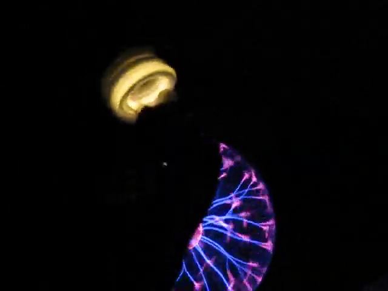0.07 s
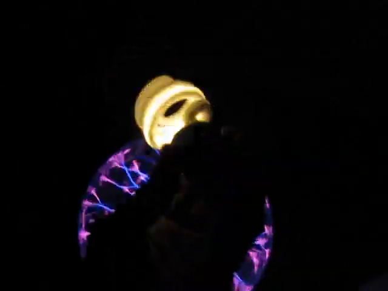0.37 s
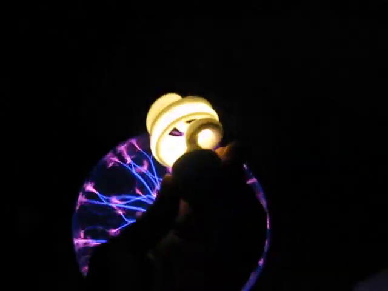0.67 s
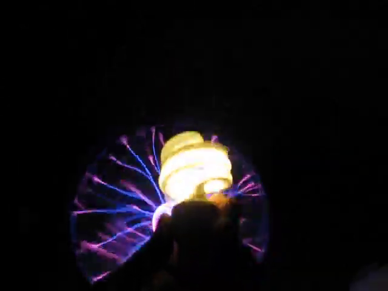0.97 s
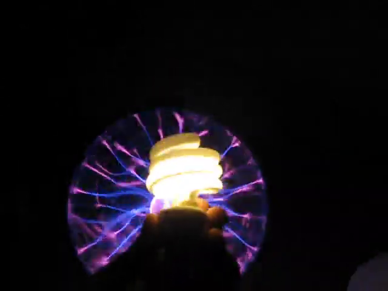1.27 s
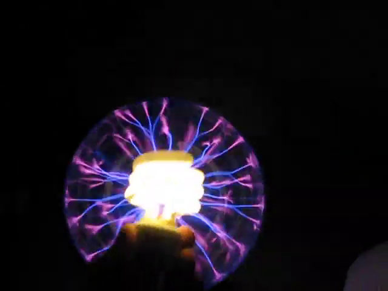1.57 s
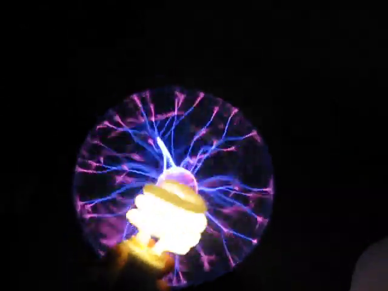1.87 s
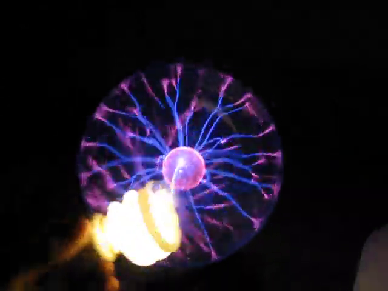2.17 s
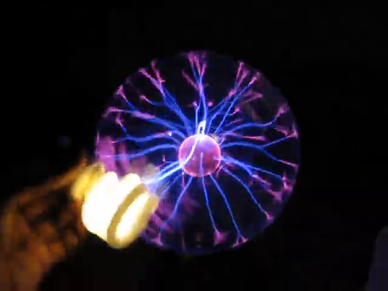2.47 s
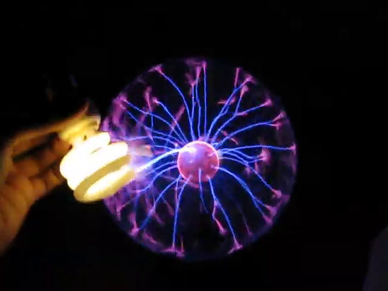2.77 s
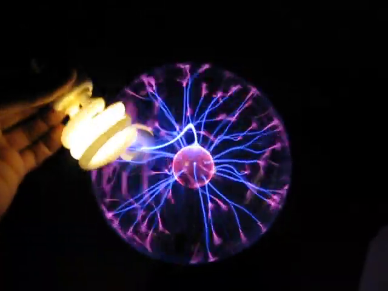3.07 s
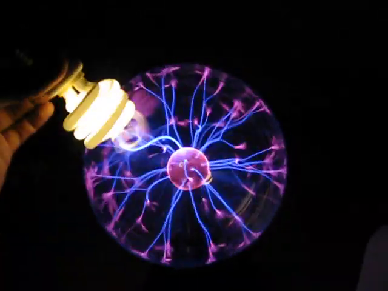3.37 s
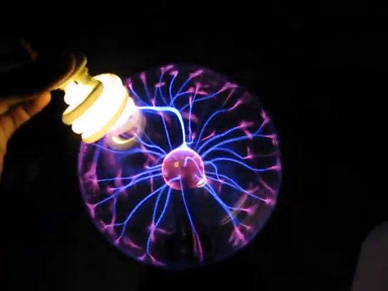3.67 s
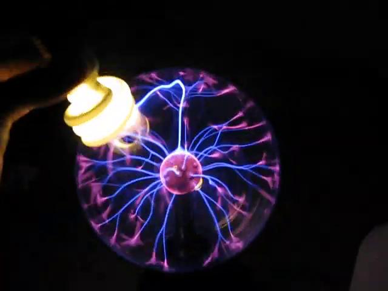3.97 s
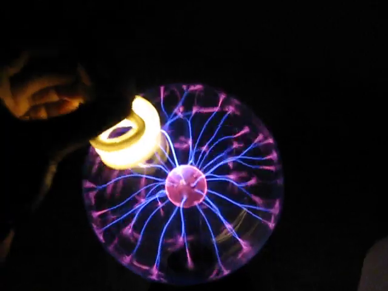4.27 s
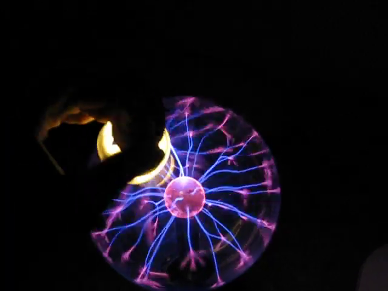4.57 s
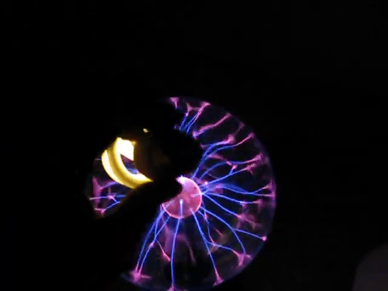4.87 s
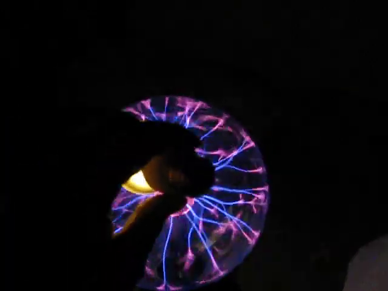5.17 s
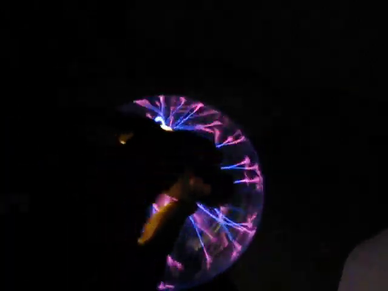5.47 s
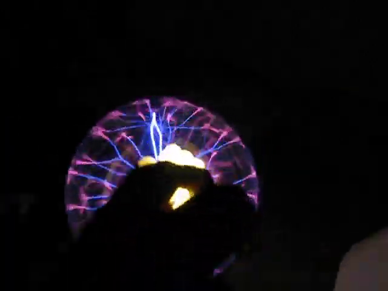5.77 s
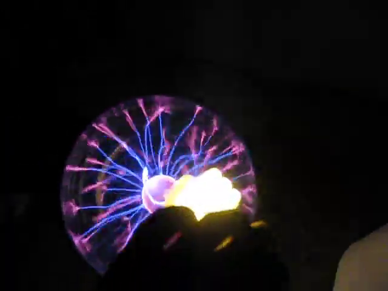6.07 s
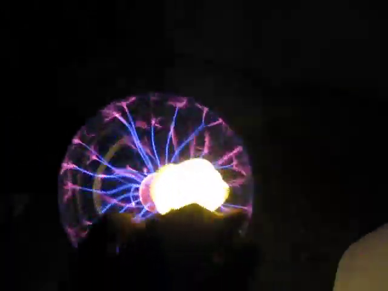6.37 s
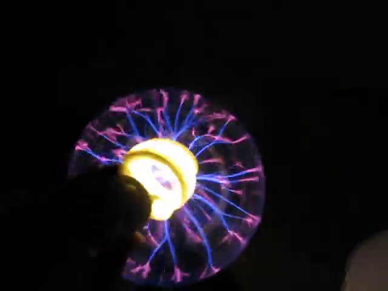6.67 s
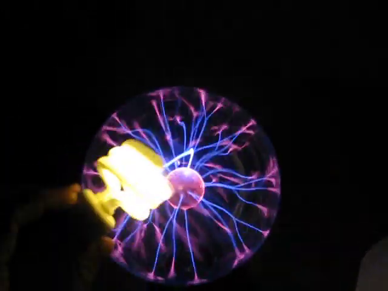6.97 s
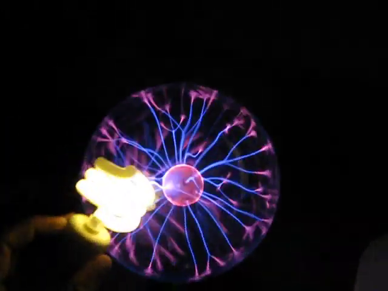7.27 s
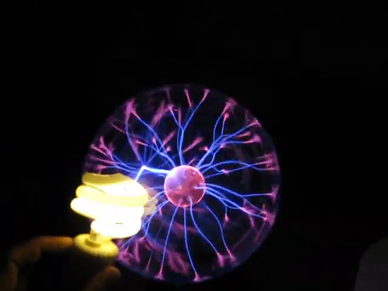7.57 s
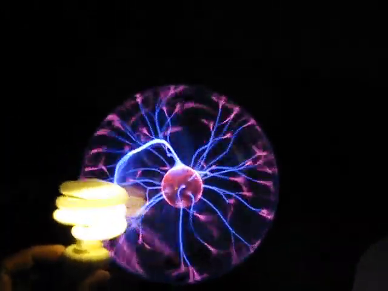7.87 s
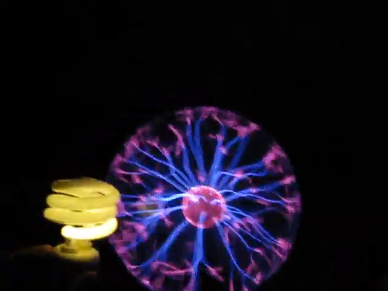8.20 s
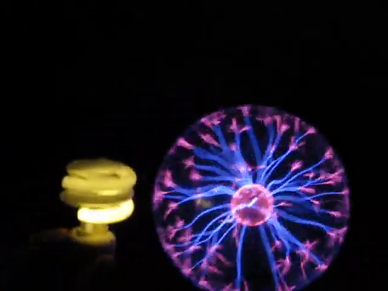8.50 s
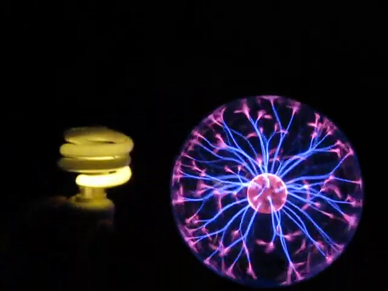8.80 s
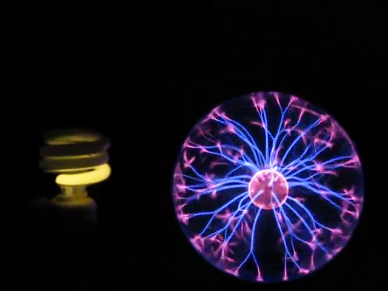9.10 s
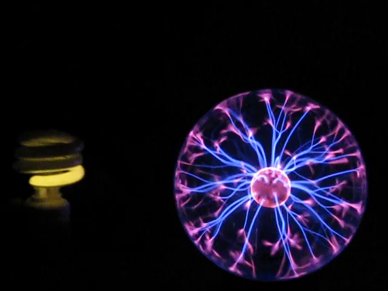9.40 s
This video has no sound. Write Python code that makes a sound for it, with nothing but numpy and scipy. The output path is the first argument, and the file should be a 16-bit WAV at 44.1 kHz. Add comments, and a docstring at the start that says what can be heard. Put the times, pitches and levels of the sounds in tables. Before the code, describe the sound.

In a small quiet room, a hand knocks a spiral light bulb against the glass globe of a plasma lamp: a quick cluster of sharp clacks, then weaker ones and a static pop. The bulb slides over the glass with two short squeaks, small low chirps, light taps and a faint ringing after some rubs. Soft hiss, a low-level drone, a thin high whine and tiny electric ticks continue underneath.

```python
"""A small quiet room, where a hand knocks a spiral light bulb against the globe of a plasma lamp.
Glass clacks on glass, then the bulb slides over the surface in stick-slip: two squeaks and small low
chirps, with a glass mode singing on after some rubs and lighter knocks in between.
Behind it sit hiss, a soft drone, the thin whine of the lamp's driver and its discharges:
faint electric ticks in step with the mains, and one static pop."""
import sys
import numpy as np
from scipy import signal
from scipy.fft import rfft, irfft
from scipy.io import wavfile
from scipy.ndimage import uniform_filter1d

SR = 44100
rng = np.random.default_rng(int(sys.argv[2]) if len(sys.argv) > 2 else 0)


def store_wav(level_fs):
    """Save 16-bit WAV to argv[1]."""
    pcm = np.round(np.clip(np.atleast_2d(level_fs), -1, 1) * 32767)
    wavfile.write(sys.argv[1], SR, pcm.T.astype(np.int16))


N = 425124


def amp(db):
    return 10 ** (np.asarray(db) / 20)


def unit(x):
    return x / np.sqrt(np.mean(x ** 2) + 1e-20)


def decay(t, t60_s):
    return np.exp(-np.log(1000) * t / t60_s)


def curve(points, hz):
    """Reads a breakpoint curve along a log frequency axis."""
    point_hz, value = np.transpose(points)
    return np.interp(np.log(hz + 1), np.log(point_hz + 1), value)


def add(mix, start_s, sound):
    part = mix[round(start_s * SR):][:len(sound)]
    part += sound[:len(part)]


def noise(size, gain_at):
    """Noise of rms 1, shaped by gain_at(hz)."""
    return unit(irfft(rfft(rng.standard_normal(size)) * gain_at(np.fft.rfftfreq(size, 1 / SR)), size))


def wander(size, rate_hz):
    """Smooth random modulation of rms 1, rolled off above rate_hz."""
    return noise(size, lambda hz: 1 / (1 + (hz / rate_hz) ** 4))


def click(db_at, size=4096):
    """The tightest causal pulse with the spectrum db_at(hz)."""
    log_gain = np.log(amp(db_at(abs(np.fft.fftfreq(size, 1 / SR)))))
    return np.fft.ifft(np.exp(signal.hilbert(log_gain).conj())).real[:size // 2]


def tail(t60_at, attack_s, size=SR // 2):
    """Dense echoes of energy 1, each band dying away in t60_at(hz) seconds."""
    hz, t, bands = signal.stft(rng.choice([-1., 1.], size), SR, nperseg=128)
    echoes = signal.istft(bands * decay(t, t60_at(hz)[:, None]), SR, nperseg=128)[1][:size]
    echoes *= 1 - np.exp(-(np.arange(size) / SR / attack_s) ** 2)
    spectrum = rfft(echoes, 2 * size)
    band_power = abs(uniform_filter1d(abs(spectrum) ** 2, size=300))
    echoes = irfft(spectrum / np.sqrt(band_power + 1e-20))[:size]  # equal energy in every band
    return echoes / np.linalg.norm(echoes)


# EQ of the hiss bed: freq_hz, gain_db
HISS_EQ = [(20, -8.5), (60, -4.5), (120, -3), (300, -0.5), (450, -1.5), (560, 3), (660, -1), (760, 3.5),
           (900, -1), (1600, -3), (2600, -6.5), (6000, -11.5), (10000, -16.5), (16000, -25)]
# narrow resonances of the room's drone: pitch_hz, width_hz, level_db
DRONE_BANDS = [(545.8, 24.5, -61), (620, 17, -67), (386, 33, -73.5)]

def room_tone(hiss_db=-51):
    """A steady bed of hiss, with a soft drone from the room's resonances."""
    hiss = amp(hiss_db) * noise(N, lambda hz: amp(curve(HISS_EQ, hz)))
    drone = sum(amp(level_db) * noise(N, lambda hz: 1 / (1 + (2 * (hz - pitch_hz) / width_hz) ** 2))
                for pitch_hz, width_hz, level_db in DRONE_BANDS)
    return hiss + drone


# brief swells of the whine: peak_s, boost_db
WHINE_BOOSTS = [(2.27, 9), (6.33, 9)]

def driver_whine(pitch_hz=12742, level_db=-80.5, flicker_db=3.5, swell_half_s=.09):
    """The lamp's driver gives a thin tone that wavers in pitch and flickers in level."""
    t = np.arange(N) / SR
    tone = np.sin(2 * np.pi * np.cumsum(pitch_hz + 35 * wander(N, 60)) / SR)
    flicker = amp(flicker_db * wander(N, 6))
    swells_db = sum(db * np.exp(-((t - peak_s) / swell_half_s) ** 2) for peak_s, db in WHINE_BOOSTS)
    return amp(level_db + swells_db) * unit(tone * flicker)


def sparks(mains_hz=50, tick_db=-47, tick_decay_s=.00022, pop_s=1.4585, pop_db=-23, pop_hz=520):
    """The lamp's discharges bleed in electrically: tiny dry ticks at mains crests, and one static pop."""
    spikes = np.zeros(N)
    crests = (np.arange(int(N / SR * 2 * mains_hz)) * SR / (2 * mains_hz)).astype(int)
    spikes[crests] = rng.standard_normal(len(crests)) * amp(tick_db)
    spikes[crests[1::2]] /= 2  # one half-wave sparks more weakly
    ticks = signal.lfilter([1], [1, -np.exp(-1 / (tick_decay_s * SR))], spikes)
    pop_phase = 2 * np.pi * pop_hz * np.arange(SR // 100) / SR
    add(ticks, pop_s, -amp(pop_db) * (pop_phase * np.exp(1 - pop_phase)) ** 2)
    return signal.lfilter(*signal.butter(1, 140, "high", fs=SR), ticks)


def shell(eq, scatter_db, t60_s, trip_s=.0004, smear=0.62):
    """A coloured click followed by waves that scatter briefly through the glass."""
    waves = amp(scatter_db) * tail(lambda hz: np.full_like(hz, t60_s), attack_s=0.0011)
    waves[0] += 1
    sound = signal.fftconvolve(waves, click(lambda hz: curve(eq, hz)))
    # all-pass: the trip round the thin wall smears the transient without colouring it
    trip = np.exp(-2j * np.pi * np.fft.rfftfreq(len(sound), 1 / SR) * trip_s)
    return irfft(rfft(sound) * (smear + trip) / (1 + smear * trip), len(sound))


# hits on the globe: start_s, level_db, thud_eq_db, snap_eq_db, rebound_delay_s (plays if over 1 ms)
GLOBE_HITS = [(0.9456, 1, -3, -1.5, 0), (0.9736, -2, -5, -1.5, 0), (0.9887, -5, -1, 2, 0.00044),
              (1.1887, -9.5, 0, -6.5, 0.00076), (1.2041, -13.5, 2.5, -4.5, 0.0099),
              (1.2215, -18, -4, -8, 0.0017), (1.335, -20, -6, -9, 0.0054), (2.653, -26.5, 2, 0.5, .0029),
              (3.4279, -26.5, 15.5, 10.5, 0.00094), (3.696, -27, 11, -3, 0.0047), (7.158, -34, 1, -6, 0),
              (7.685, -30, 3, -4, 0.001), (7.838, -36, 3, 1, 0.0056)]
# the bulb's tube pings when a hit catches a coil: start_s, level_db, pitch_hz, width_hz
COIL_PINGS = [(0.9455, -1, 1950, 450), (0.9736, -3, 1900, 450), (0.9887, 7, 2860, 300),
              (1.1888, -6, 2850, 260), (1.3347, -17, 1450, 400), (1.769, -2.5, 3340, 200),
              (2.653, -15, 1580, 130), (3.4272, -3.5, 2610, 140), (3.439, -4.5, 2590, 130)]
# EQ of the glass-on-glass clack: freq_hz, gain_db
CLACK_EQ = [(20, -60), (70, -30), (130, -14), (220, 5), (430, 1), (600, 9), (1130, 1.5), (1750, 3.5),
            (2250, -5), (2850, -3), (3750, -16), (6400, -12.5), (8500, -7), (11000, -16), (16000, -26)]
# ringing modes of the glass: pitch_hz, gain_db, t60_s
GLASS_MODES = [(244.5, -9, 0.12), (553, -6, 0.14), (720, 4, 0.035), (930, -9, .04), (1360, -12, 0.25),
               (1515, -4.5, 0.11), (1760, -5, 0.053), (1900, -9, 0.072), (2540, -9.5, 0.13),
               (2760, -14, 0.08), (5140, -1, 0.021), (6930, -11, .12), (8200, 6, 0.039), (9170, -4, 0.036),
               (10200, -11, .1)]

def knocks(clack_db=8.5, ring_db=-29, rebound_db=-0.5, thud_hz=250, thud_width_hz=240, snap_hz=4500):
    """Hits and pings drive the shell's clack and modes; where the bulb is hit sets its thud and snap."""
    blows, t = np.zeros(N), np.arange(SR // 2) / SR
    for start_s, level_db, thud_db, snap_db, rebound_s in GLOBE_HITS:
        def hit_eq(hz):
            thud_bell = thud_db / (1 + (2 * (hz - thud_hz) / thud_width_hz) ** 2)
            snap_shelf = snap_db * hz ** 4 / (hz ** 4 + snap_hz ** 4)
            return thud_bell + snap_shelf
        blow = amp(level_db) * click(hit_eq)
        add(blows, start_s, blow)
        if rebound_s > .001:
            add(blows, start_s + rebound_s, amp(rebound_db) * blow)
    for start_s, level_db, pitch_hz, width_hz in COIL_PINGS:
        damping = np.pi * width_hz
        ping = 2 * damping / SR * np.exp(-damping * t) * np.cos(2 * np.pi * pitch_hz * t)
        add(blows, start_s, amp(level_db) * ping)
    body = amp(clack_db) * shell(CLACK_EQ, scatter_db=-1, t60_s=0.036)[:len(t)]
    for pitch_hz, gain_db, t60_s in GLASS_MODES:
        body += amp(ring_db + gain_db) * decay(t, t60_s) * np.cos(2 * np.pi * pitch_hz * t)
    return -signal.oaconvolve(blows, body)[:N]


# overtones of a sharp slip: harmonic_number, gain_db
SLIP_HARMONICS = [(3, -10), (4, -16), (5, -6), (6, -0.5), (7, -3), (8, -11), (9, -13.5), (10, -14),
                  (11, -20)]
# EQ of the scraping contact: freq_hz, gain_db
SCRAPE_EQ = [(200, -23), (1300, -17), (3000, -9), (4300, -10), (6500, -5), (8000, 2), (10000, 4),
             (12000, -4), (16000, -16)]

def slip_treble(phase, roughness, shift_db=3, scrape_db=-2):
    """The bright edge of a squeak: slip harmonics that give way to scrape as roughness rises."""
    size = len(phase)
    # the shell carries each overtone by its own path, which shifts as the contact moves
    slips = sum(amp(db + shift_db * wander(size, 60)) * np.cos(k * phase + 2 * np.pi * rng.random())
                for k, db in SLIP_HARMONICS)
    scrape = noise(size, lambda hz: amp(curve(SCRAPE_EQ, hz)))
    return np.sqrt(1 - roughness ** 2) * unit(slips) + amp(scrape_db) * np.sqrt(roughness) * scrape


# squeaks of the gripping bulb:
# grip_s, break_s, release_s, build_s, pitch_hz, glide_hz_per_s, fundamental_db, octave_db, slip_db
SQUEAK_CUES = [(1.732, 1.764, 1.7636, 0.079, 1349, -200, -27.5, -21.5, -27),
               (2.701, 2.749, 2.784, 0.01, 1314, 850, -43, -45.5, -34.5)]

def squeaks(lock_s=0.0071, breakup_s=.008, mode_hz=1342, jitter=0.034, release_db_per_s=1250):
    """A glass mode swells under friction, locks into sharp slips, breaks into a rasp and rings free."""
    out = np.zeros(N)
    for grip_s, break_s, release_s, build_s, pitch_hz, glide, tone_db, octave_db, slip_db in SQUEAK_CUES:
        t = np.arange(grip_s - .1, release_s + .15, 1 / SR)
        swell = np.clip(1 + (t - grip_s) / build_s, 0, 1) ** 2
        locked = np.clip(1 + (t - grip_s) / lock_s, 0, 1) ** 2
        broken = np.clip((t - break_s) / breakup_s, 0, 1)
        def morph(clean, rasp):
            return clean + (rasp - clean) * broken
        roughness = morph(0.076, 0.89)
        hz = morph(pitch_hz + glide * (t - grip_s), mode_hz)  # the rasp falls back to the free mode
        phase = 2 * np.pi * np.cumsum(hz * (1 + jitter * roughness * wander(len(t), 1200))) / SR
        treble = locked * amp(slip_db) * slip_treble(phase, roughness)
        fundamental = swell * amp(morph(tone_db, slip_db)) * np.cos(phase)
        octave = swell ** 9.1 * amp(morph(octave_db, slip_db - 7.5)) * np.sin(2 * phase)  # blooms late
        stutter = 1 + .5 * roughness * wander(len(t), 280)  # the grip comes and goes
        rubbed = np.sqrt(2) * (fundamental + octave) * stutter + treble
        free_s = np.maximum(t - release_s, 0)
        contact = amp(-release_db_per_s * free_s)
        ring_out = amp(tone_db - 12) * decay(free_s, t60_s=0.22) * np.cos(2 * np.pi * mode_hz * t)
        add(out, t[0], contact * rubbed + (1 - contact) * np.sqrt(2) * ring_out)
    return out


# chirps of the dragging bulb: start_s, length_s, pitch_hz, glide_ratio (end / start), level_db
CHIRP_CUES = [(1.767, 0.017, 926, 0.88, -35), (2.319, 0.062, 333, 1.06, -47.5),
              (2.501, 0.046, 394, 0.91, -52.5), (2.649, 0.031, 345, 1.5, -45),
              (2.779, 0.037, 863, .97, -33), (2.78, 0.024, 448, 1.15, -43.5),
              (2.978, 0.069, 732, 1.01, -41), (3.176, 0.065, 319.3, 0.67, -48),
              (5.437, 0.042, 359, 0.93, -52.5), (5.851, 0.025, 605, 0.96, -44.5),
              (6.326, 0.032, 373, 1.06, -54), (6.471, 0.23, 222, 0.86, -58.5), (7.09, .04, 1052, 0.93, -53),
              (7.16, 0.031, 460, 1.04, -53.5), (7.685, 0.071, 368, 1.05, -47),
              (7.823, 0.045, 347, 0.89, -54.5)]

def chirps(attack_s=0.0036, jitter=0.034, full_buzz_octaves_per_s=3.4, rolloff_hz=1250):
    """Slower stick-slip: nearly pure when a mode holds the pitch, buzzier the faster it glides."""
    out = np.zeros(N)
    for start_s, length_s, pitch_hz, glide, level_db in CHIRP_CUES:
        t = np.arange(int(length_s * SR)) / SR
        waver = jitter / (1 + (length_s / 0.088) ** 2) * wander(len(t), 150)  # long chirps are steadier
        phase = 2 * np.pi * np.cumsum(pitch_hz * glide ** (t / length_s) * (1 + waver)) / SR
        buzz = min(abs(np.log2(glide)) / length_s / full_buzz_octaves_per_s, 1)
        octave_db = -15.5 + 16 * buzz
        overtones = sum(amp(db) * np.sin(k * phase) / (1 + (k * pitch_hz / rolloff_hz) ** 6)
                        for k, db in ((2, octave_db), (3, octave_db - 3)))
        envelope = (1 - np.exp(-t / attack_s)) * np.cos(np.pi / 2 * t / length_s)
        add(out, start_s, np.sqrt(2) * amp(level_db) * envelope * (np.sin(phase) + overtones))
    return out


# pure rings set off by dragging: start_s, level_db, t60_s
RING_CUES = [(2.76, -51, .9), (5.856, -47, 0.24), (7.684, -46.5, 0.23)]

def rings(pitch_hz=1135, attack_s=0.0054):
    """One mode of the glass sings on after a rub and dies away under the hand's damping."""
    out, t = np.zeros(N), np.arange(SR // 2) / SR
    tone = np.sqrt(2) * (1 - np.exp(-t / attack_s)) * np.sin(2 * np.pi * pitch_hz * t)
    for start_s, level_db, t60_s in RING_CUES:
        add(out, start_s, amp(level_db) * decay(t, t60_s) * tone)
    return out


# EQ of one light touch on the globe: freq_hz, gain_db
TOUCH_EQ = [(500, -35), (2000, -13), (5500, -8), (8500, 3), (13000, 0.5), (16000, -1)]

def light_touch(start_s=6.4927, gain_db=-19):
    """A contact so brief that only the treble of the glass answers."""
    out = np.zeros(N)
    add(out, start_s, amp(gain_db) * shell(TOUCH_EQ, scatter_db=3, t60_s=.035))
    return out


# reverb time of the room: freq_hz, t60_s
ROOM_DECAY = [(150, 0.4), (400, 0.23), (1000, 0.27), (2800, 0.14), (7300, 0.16), (15000, .12)]

def room(direct, wet_db):
    """The direct sound plus the short tail of a small furnished room."""
    echoes = tail(lambda hz: curve(ROOM_DECAY, hz), attack_s=0.0065)
    return direct + amp(wet_db) * signal.oaconvolve(direct, echoes)[:N]


def scene():
    """The glass plays in the room, over room tone and the lamp's dry whine and sparks."""
    glass = room(knocks() + light_touch(), wet_db=-9)
    glass += room(squeaks(), wet_db=-10)
    glass += room(chirps() + rings(), wet_db=-10)
    return (glass + room_tone() + driver_whine() + sparks())[None]


def record(dry, cutoff_hz=15900):
    """A steep low-pass trims the very top of the mix."""
    lowpass = signal.firwin(511, cutoff_hz, window=("kaiser", 9), fs=SR)
    return signal.oaconvolve(dry, lowpass[None], "same")


dry = scene()
out = record(dry)
store_wav(out)
```